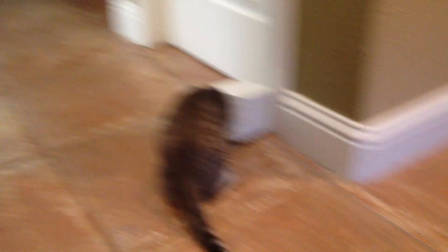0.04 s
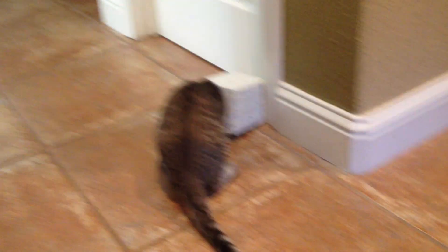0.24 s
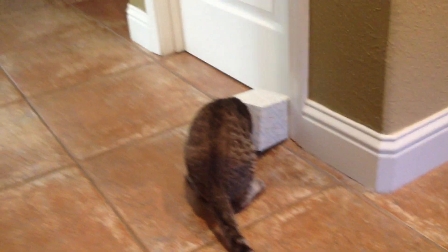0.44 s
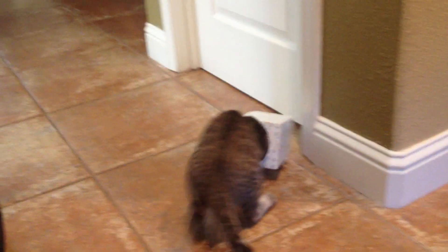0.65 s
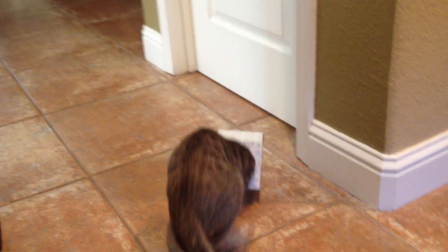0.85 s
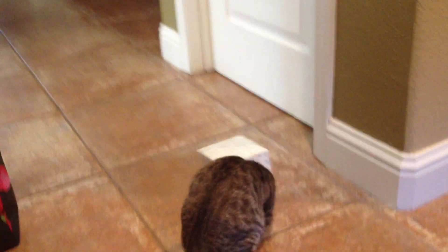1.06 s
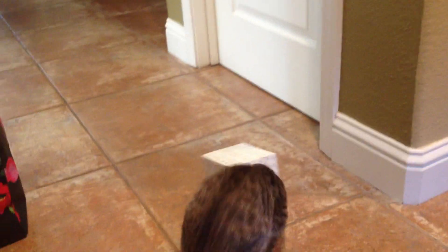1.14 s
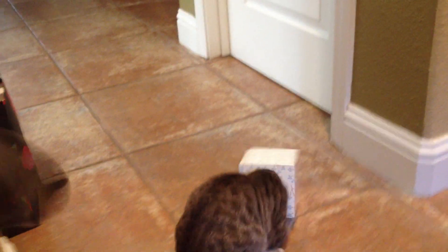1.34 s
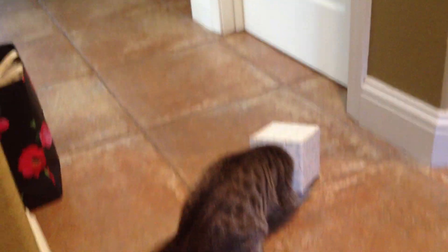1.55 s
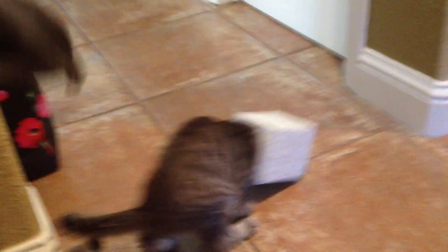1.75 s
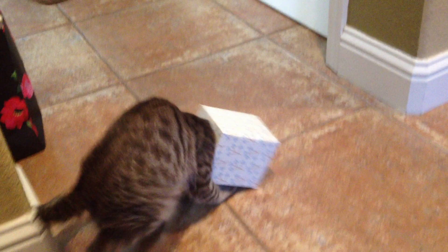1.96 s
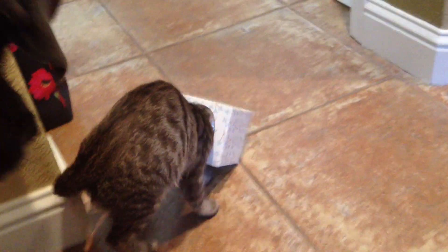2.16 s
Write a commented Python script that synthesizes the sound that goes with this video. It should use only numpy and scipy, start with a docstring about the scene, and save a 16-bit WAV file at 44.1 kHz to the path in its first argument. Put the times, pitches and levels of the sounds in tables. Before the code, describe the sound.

Small metal pet tags jingle in quick bright rattles as a cardboard box scrapes on tile

```python
"""A kitten with its head in a cardboard tissue box scuffles over tiles in a small hard room, over a quiet hush.
Claw ticks and a hard tap come first, then a tag clink over a short low thud.
Tag clinks go on in quick rattles (contact bursts driving metal modes) while the box scrapes and knocks
(slip noise through cardboard, panel and air modes), with more claw ticks and a tap between.
From the middle on, soft hollow bumps (blows on low modes) follow among the last clinks, claws and a tap."""
import sys
import numpy as np
from scipy import signal
from scipy.fft import rfft, irfft, next_fast_len
from scipy.io import wavfile
from scipy.ndimage import uniform_filter1d, map_coordinates

SR = 44100
rng = np.random.default_rng(int(sys.argv[2]) if len(sys.argv) > 2 else 0)


def waveform_to_disk(signal):
    """Save audio, clipped to [-1, 1], as 16-bit WAV at the path in sys.argv[1]."""
    frames = np.transpose(np.atleast_2d(signal))
    scaled = np.clip(frames, -1, 1) * 32767
    samples = np.round(scaled).astype(np.int16)
    wavfile.write(sys.argv[1], SR, samples)


N = 97020
T = np.arange(SR // 2) / SR  # time axis of one event, s
CONTACTS_PER_S = 780  # tags and taps
MODE_RISE_S, WANDER_POINTS_PER_S = 0.00015, 360


def amp(db):
    """Decibels to gain."""
    return 10 ** (np.asarray(db) / 20)


def along(points, hz):
    """Interpolate (Hz, value) points on a log frequency axis."""
    point_hz, values = np.transpose(points)
    return np.interp(np.log(hz + 1), np.log(point_hz + 1), values)


def strike_unit(x):
    """Scale so that the loudest 15 ms have rms 1."""
    power = uniform_filter1d(x * x, size=660, mode="constant")
    return x / np.sqrt(power.max() + 1e-20)


def colour(x, db_of_hz):
    """Causal minimum-phase filter with the given dB curve, by folding the cepstrum."""
    m = 2 * len(x)
    hz = np.fft.rfftfreq(m, 1 / SR) + 1
    cepstrum = irfft(np.log(amp(db_of_hz(hz)) + 1e-6))
    cepstrum[1:m // 2] *= 2
    cepstrum[m // 2 + 1:] = 0
    response = np.exp(rfft(cepstrum))
    return irfft(rfft(x, m) * response)[:len(x)]


def low_cut(x, hz, order):
    """Butterworth high-pass at hz."""
    return signal.sosfilt(signal.butter(order, hz, "high", fs=SR, output="sos"), x)


def contacts(swell_s, decay_s, per_s, grit):
    """Random tiny impacts over fine grit; they swell, then decay exponentially."""
    swell_s, decay_s = swell_s + 1e-5, decay_s + 1e-4  # keeps both above zero
    rise = np.minimum(T / swell_s, 1) ** 2
    fall = np.exp(-np.maximum(T - swell_s, 0) / decay_s)
    hits = (rng.random(len(T)) < per_s / SR) * rng.standard_normal(len(T))
    hits[int(swell_s * SR) + 1] = 1.6  # one sure hit at the crest
    return rise * fall * (hits + grit * rng.standard_normal(len(T)))


def wander(hz, share):
    """A pitch drifting at random about hz; share is the relative deviation of the drift points."""
    points = rng.standard_normal(len(T) // 20)
    drift = map_coordinates(points, [T * WANDER_POINTS_PER_S], order=1)
    return hz * (1 + share * drift)


def ring(drive, hz, t60_s):
    """One resonant mode excited by the drive, at a fixed or moving pitch."""
    turn = np.exp(2j * np.pi * np.cumsum(np.broadcast_to(hz, T.shape)) / SR)
    poles = [amp(-60 / (t60_s * SR)), np.exp(-1 / (MODE_RISE_S * SR))]
    envelope = signal.lfilter([1], np.poly(poles), drive * turn.conj())
    return strike_unit((turn * envelope).imag)


# Reverberation of the tiled room. Each row: frequency in Hz, t60 in s.
ROOM_DECAY = [(150, 0.34), (3000, 0.41), (8000, 0.47), (15000, 0.28)]


def add(track, start_s, x, wet_db):
    """Place a sound with its own room tail: noise decaying at a rate set by frequency."""
    hz, t, bins = signal.stft(rng.standard_normal(len(T)), SR, nperseg=256)
    decay = amp(-60 * t / along(ROOM_DECAY, hz)[:, None])
    tail = signal.istft(bins * decay, SR, nperseg=256)[1][:len(T)]
    tail *= 1 - np.exp(-T / 0.0011)  # soft onset
    tail /= np.linalg.norm(tail)
    heard = x + amp(wet_db) * signal.fftconvolve(x, tail)[:len(T)]
    part = track[int(start_s * SR):][:len(T)]
    part += heard[:len(part)]


# Spectrum of the hush. Each row: frequency in Hz, level in dB.
HUSH_SPECTRUM = [(40, -31), (170, -2), (500, -3), (1200, -9.5), (15000, -15)]
HUSH_RMS_DB = -61.5


def room_tone():
    """The quiet steady hush of the house: stationary filtered noise."""
    hush = colour(rng.standard_normal(N), lambda f: along(HUSH_SPECTRUM, f))
    return amp(HUSH_RMS_DB) * hush / hush.std()


CLAW_WET_DB = -5.5  # claws and taps
# Hard taps. Each row: start in seconds, mode in Hz, level in dB.
HARD_TAPS = [(.1945, 2230, -44), (1.0857, 6020, -33.5), (1.916, 2200, -50.5)]


def taps():
    """A few quick contacts wake a single short ring."""
    out = np.zeros(N)
    for start_s, hz, db in HARD_TAPS:
        drive = contacts(0, 0.004, CONTACTS_PER_S, grit=0)
        tap = ring(drive, wander(hz, 0.019), t60_s=0.043)
        add(out, start_s, amp(db) * tap, CLAW_WET_DB)
    return out


CLAW_HALF_WIDTH_OCT = 0.69  # to -3 dB
# Claw ticks and scratches. Each row: start in seconds, decay in s, level in dB, band centre in Hz.
CLAW_TICKS = [(0.1892, 0.0013, -43, 4700), (0.1939, 0.0015, -42.5, 3560), (0.463, 0.0055, -31.5, 5660),
              (0.709, 0.01, -31.5, 3280), (1.15, 0.0009, -38, 7240), (1.449, 0.041, -38, 3650),
              (1.859, 0.043, -45.5, 5960), (1.919, 0.0013, -46, 4400), (2.1143, 0.0033, -41.5, 6460)]


def claws():
    """Dry claw contacts on the tiles: band-limited impact noise."""
    out = np.zeros(N)
    for start_s, decay_s, db, centre_hz in CLAW_TICKS:
        def band_db(f):
            return -10 * np.log10(1 + (np.log2(f / centre_hz) / CLAW_HALF_WIDTH_OCT) ** 4)
        tick = colour(contacts(0.0016, decay_s, 700, grit=0.28), band_db)
        add(out, start_s, amp(db) * strike_unit(tick), CLAW_WET_DB)
    return out


THUD_S, THUD_HZ, THUD_HALF_WIDTH_S = 0.227, 220, 0.0022  # half width to 1/e
PUSH_DB, KNOCK_DB, KNOCK_HZ = -22.5, -36.02, 2570  # levels before the low cut; knock is -6 dB at KNOCK_HZ
THUD_LOW_CUT_HZ = 131


def thud():
    """A short low push under the first clink, with a dry cardboard knock and no ring."""
    t = np.arange(N) / SR - THUD_S
    shape = np.exp(-(t / THUD_HALF_WIDTH_S) ** 2)
    push = shape * np.cos(2 * np.pi * THUD_HZ * t)
    knock = colour(shape * rng.standard_normal(N), lambda f: -20 * np.log10(1 + (f / KNOCK_HZ) ** 2))
    both = amp(PUSH_DB) * push + amp(KNOCK_DB) * strike_unit(knock)
    return low_cut(both, THUD_LOW_CUT_HZ, order=3)


BUMP_WET_DB, BUMP_TOP_HZ, BUMP_LOW_CUT_HZ = -1, 1070, 159
HOLLOW_FLEX = 0.046  # relative pitch drift
# Soft bumps. Each row: start in seconds, level in dB before the band cuts, brightness in dB per octave.
SOFT_BUMPS = [(1.364, -46, 3.5), (1.66, -59, -13), (1.781, -46.5, 1.5), (1.944, -38, 7.5), (2.035, -54, 13),
              (2.179, -41.5, -13.5)]
# Hollow modes. Each row: frequency in Hz, level in dB before brightness, t60 in s.
HOLLOW_MODES = [(187.3, 3.5, 0.63), (275, -5.5, 0.54), (382, 2, 0.28), (443, 9, 0.072), (586, 2, 0.1),
                (642, -7.5, 0.12), (948, -9, 0.036)]


def bumps():
    """Soft blows wake only low hollow modes."""
    out = np.zeros(N)
    for start_s, db, tilt in SOFT_BUMPS:
        drive = contacts(0.00583, 0.012, 400, grit=0.044)
        body = np.zeros(len(T))
        for hz, mode_db, t60_s in HOLLOW_MODES:
            level = amp(mode_db + tilt * np.log2(hz / 400))
            body += level * ring(drive, wander(hz, HOLLOW_FLEX), t60_s)
        add(out, start_s, amp(db) * strike_unit(body), BUMP_WET_DB)
    soft = colour(out, lambda f: -10 * np.log10(1 + (f / BUMP_TOP_HZ) ** 10))
    return low_cut(soft, BUMP_LOW_CUT_HZ, order=7)


SLIPS_PER_S, BOX_WET_DB, BOX_LOW_CUT_HZ = 300, -4, 170
PANEL_T60_S, PANEL_FLEX, PANEL_DB = 0.0079, 0.13, -5.5  # flex: relative pitch drift; dB re the rasp
CAVITY_HZ, CAVITY_T60_S, CAVITY_DB = 299, 0.069, -10  # the air in the box
# Box scrapes and knocks. Each row: start in seconds, swell in s, decay in s, level in dB before the
# low cut, brightness in dB per octave, panel mode in Hz.
BOX_SCRAPES = [(0.324, 0.023, 0.043, -50, 7, 950), (0.424, 0.011, 0.018, -37, 3.5, 850),
               (.509, 0.013, 0.015, -47, -1.5, 1400), (0.547, 0.003, 0.019, -28, 1.5, 970),
               (0.666, 0.0095, 0.023, -39.5, 0, 650), (0.794, 0.0091, 0.035, -35, 2, 950),
               (0.867, 0.011, 0.22, -40, 7, 1430), (.911, 0.0039, 0.011, -33.5, 0, 820),
               (0.984, 0.00409, 0.0036, -33.5, 1, 1470), (1.021, 0.013, 0.019, -36, 0, 850),
               (1.116, 0.012, 0.02, -45, -17, 297), (1.1507, 0.0011, 0.013, -31.5, 2, 750),
               (1.195, 0.0094, 0.051, -45, -2, 1150)]
# Cardboard rasp spectrum. Each row: frequency in Hz, level in dB.
RASP_SPECTRUM = [(40, -8), (200, -11), (300, 0.5), (800, -3), (1700, -2), (3000, -11.5), (15000, -21.5)]


def box():
    """The cardboard sticks and slips on the tiles, shaking its panels and the air inside."""
    out = np.zeros(N)
    for start_s, swell_s, decay_s, db, tilt, panel_hz in BOX_SCRAPES:
        drive = contacts(swell_s, decay_s, SLIPS_PER_S, grit=0.13)
        rasp = strike_unit(colour(drive, lambda f: along(RASP_SPECTRUM, f)))
        panel = amp(PANEL_DB) * ring(drive, wander(panel_hz, PANEL_FLEX), PANEL_T60_S)
        cavity = amp(CAVITY_DB) * ring(drive, CAVITY_HZ, CAVITY_T60_S)
        scrape = colour(rasp + panel + cavity, lambda f: tilt * np.log2(np.clip(f, 200, 4000) / panel_hz))
        add(out, start_s, amp(db) * strike_unit(scrape), BOX_WET_DB)
    return low_cut(out, BOX_LOW_CUT_HZ, order=3)


TAG_WET_DB, TAG_LOW_CUT_HZ = -5.5, 3450
LOW_TAG_S = 1.604
# Lower tag partials. Each row: frequency in Hz, level in dB before the tag low cut, t60 in s.
LOW_TAG_MODES = [(3295, -44.5, 0.14), (3720, -46.5, 0.076), (6040, -45.5, 0.13), (6590, -39.5, .1)]


def add_low_tag(track):
    """The lower tag partials ring out once."""
    drive = contacts(0.031, 0.014, CONTACTS_PER_S, grit=0.063)
    tone = sum(amp(db) * ring(drive, hz, t60_s) for hz, db, t60_s in LOW_TAG_MODES)
    add(track, LOW_TAG_S, tone, TAG_WET_DB)


TOUCH_T60_S, TOUCH_DETUNE = 0.043, 0.0075  # a jostled tag is damped and wanders off pitch
FREE_DB, FREE_DETUNE = -3.5, 0.00083  # free ring re the touching ring, before the row's tail dB; pitch scatter
# Tag clinks. Each row: start in seconds, swell in s, rattle decay in s, tail in dB (offsets free ring and
# room), clatter in dB, then the first, second, third and fourth high partial in dB.
TAG_CLINKS = [(0.2217, 0.00072, 0.0038, -9.5, -15.5, -16, -25, -16, -27),
              (0.368, .002, 0.0045, -0.5, -47, -41, -47, -50, -47),
              (0.4165, 0.00037, 0.036, -4.5, -32.5, -27.5, -21.5, -23, -34),
              (0.44, 0.0088, 0.0051, -4, -22, -45, -29, -19, -31),
              (0.519, 0.004, 0.0053, -1.5, -41, -50, -25, -45, -36),
              (0.5961, .001, 0.0032, -1.5, -29.5, -14.5, -21.5, -22, -20.5),
              (.711, 0.0097, 0.0012, -2, -23, -20, -22, -22, -22),
              (0.7909, .002, 0.0044, 3, -48, -26.5, -31.5, -37, -29),
              (0.836, 0.0097, 0.01, 1.5, -33, -34.5, -35, -33, -30.5),
              (0.944, 0.004, 0.031, 1, -25, -23, -21.5, -26.5, -30),
              (1.055, 0.0035, 0.0035, -3, -24.5, -21.5, -16.5, -23, -21.5),
              (1.067, 0.0018, 0.011, -9, -35, -27, -11.5, -19, -22),
              (1.178, 0.0031, 0.027, -2.5, -23, -22.5, -16, -23.5, -25.5),
              (1.281, 0.0037, 0.0018, 2, -33.5, -35, -37.5, -33, -40),
              (1.317, 0.0036, 0.0042, 3.5, -36, -35.5, -41, -41, -33.5),
              (1.455, 0.0047, 0.022, -4.5, -23, -29.5, -23.5, -25.5, -29.5),
              (1.596, 0.0061, 0.011, -1.5, -30.5, -25, -21.5, -18.5, -17),
              (1.6401, .001, 0.018, -2.5, -71, -29, -20, -54, -67),
              (1.712, 0.0013, 0.0091, -2, -44, -38, -43, -66, -32),
              (1.836, 0.0085, 0.00084, -4, -47, -32.5, -40, -37, -37.5),
              (2.029, 0.006, 0.0044, 5, -52.5, -44.5, -40.5, -39, -47),
              (2.066, 0.0012, 0.0024, -5, -49, -44.5, -42, -47, -56)]
# Tag modes in five groups: with the clatter, then one per high partial.
# Each row of a group: frequency in Hz, level in dB within the group, free t60 in s.
TAG_MODE_GROUPS = [
    [(4274, -24, 0.18), (6097, -14.5, 0.096), (6645, -18, 0.17), (8590, -20.5, 0.19)],
    [(10287, -1, 0.027)],
    [(11777, -1.5, 0.079)],
    [(13100, -3.5, 0.25)],
    [(14150, -7.5, 0.068), (15170, 0, 0.14)],
]
# Clatter spectrum. Each row: frequency in Hz, level in dB.
CLATTER_SPECTRUM = [(300, -64), (1500, -3.5), (2500, -7), (4000, -1.5), (5300, -9), (7500, 0), (9800, -4),
                    (15000, 0.5)]


def tags():
    """Tags rattle together; each clink favours other partials, damped at first, then ringing free."""
    out = np.zeros(N)
    for start_s, swell_s, rattle_s, tail_db, *levels_db in TAG_CLINKS:
        drive = contacts(swell_s, rattle_s, CONTACTS_PER_S, grit=0.41)
        clatter = colour(drive, lambda f: along(CLATTER_SPECTRUM, f))
        clink = amp(levels_db[0]) * strike_unit(clatter)
        for group_db, modes in zip(levels_db, TAG_MODE_GROUPS):
            for hz, mode_db, t60_s in modes:
                touching = ring(drive, wander(hz, TOUCH_DETUNE), TOUCH_T60_S)
                free = ring(drive, hz * (1 + FREE_DETUNE * rng.normal()), t60_s)
                partial = strike_unit(touching + amp(FREE_DB + tail_db) * free)
                clink += amp(group_db + mode_db) * partial
        add(out, start_s, clink, TAG_WET_DB + tail_db)
    add_low_tag(out)
    return colour(out, lambda f: -10 * np.log10(1 + (TAG_LOW_CUT_HZ / f) ** 6))


def scene():
    """Everything reaches one microphone; the light box and the bumps carry little bass."""
    background = room_tone() + taps() + claws()
    body = thud() + bumps() + box()
    return (background + body + tags())[None]


CEILING, TOP_HZ = 0.75, 15350  # full-scale fraction; band limit


def record(dry):
    """The recorder rounds off the highest peaks and cuts steeply above its band limit."""
    m = next_fast_len(N + SR // 2)
    hz = np.fft.rfftfreq(m, 1 / SR)
    rounded = dry / (1 + np.abs(dry / CEILING) ** 10) ** (1 / 10)
    band_gain = 1 / np.sqrt(1 + (hz / TOP_HZ) ** 200)
    return irfft(rfft(rounded, m) * band_gain, m)[:, :N]


dry = scene()
out = record(dry)
waveform_to_disk(out)
```